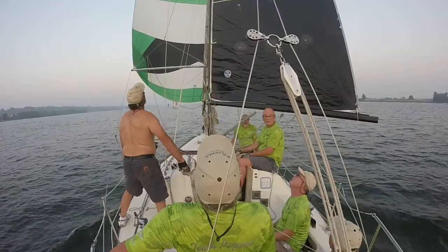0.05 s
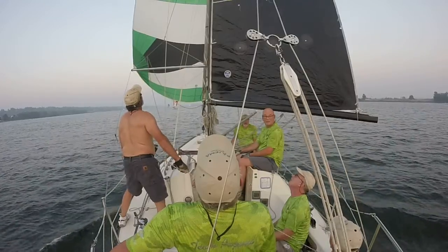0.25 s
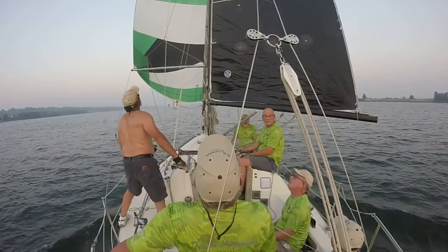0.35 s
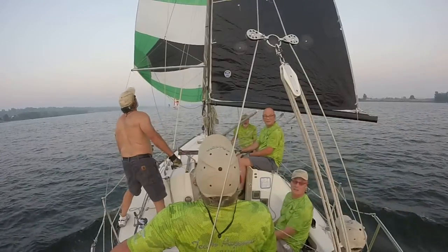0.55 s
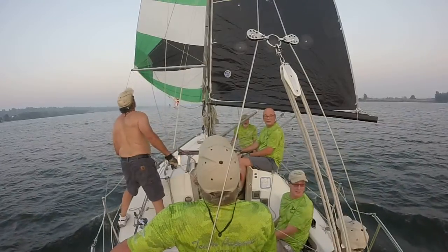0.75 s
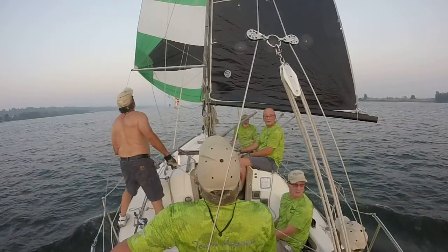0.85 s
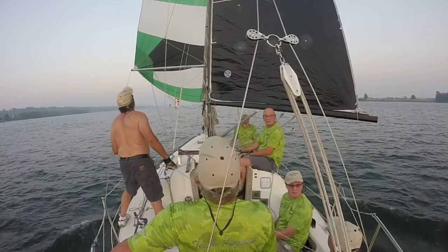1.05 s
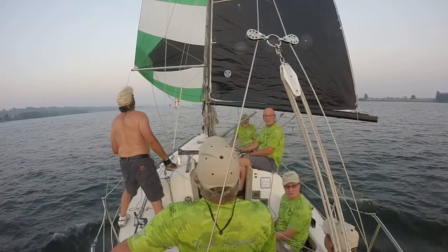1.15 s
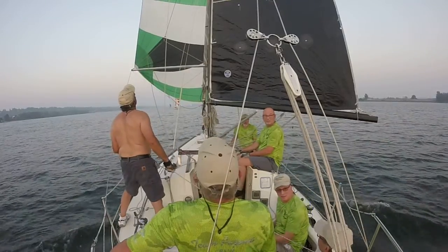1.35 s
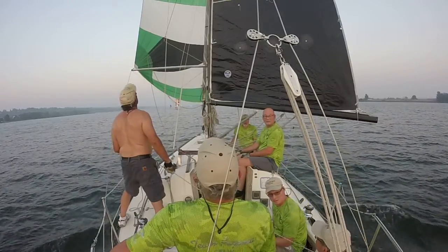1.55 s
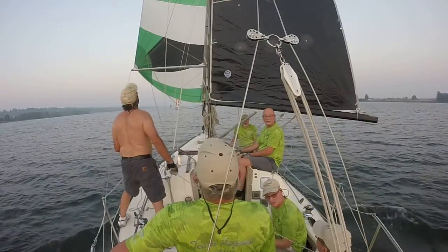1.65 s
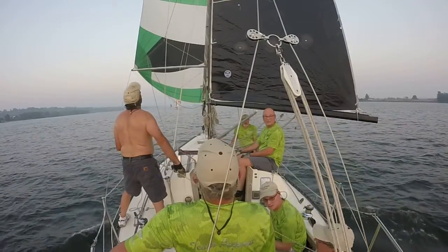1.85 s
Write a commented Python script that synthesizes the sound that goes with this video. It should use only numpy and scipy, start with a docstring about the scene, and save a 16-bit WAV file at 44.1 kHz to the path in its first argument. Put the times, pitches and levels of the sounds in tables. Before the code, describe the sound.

A hard object scrapes and clatters along a sailboat rail, then two knocks, over washing water

```python
"""On the stern of a sailboat, something drags and jolts along the rail that carries the microphone:
slips and bursts of force ring resonators, and dispersion brings the treble first; knocks on the mount
come undelayed. Water washes past as banded noise, with fizz of ringing bubbles, spatter and single
droplets, over low wind rumble and the faint drone of a far motor made of wavering harmonics."""
import sys
import numpy as np
from scipy import signal
from scipy.fft import rfft, irfft, next_fast_len
from scipy.io import wavfile
from scipy.ndimage import uniform_filter1d

SR = 44100
rng = np.random.default_rng(int(sys.argv[2]) if len(sys.argv) > 2 else 0)


def field_ratio(decibels):
    """Amplitude ratio for a level in dB (20 dB per decade); scalars and array-likes work."""
    return 10 ** (np.asarray(decibels, dtype=float) / 20)


def to_wav(s):
    """Save 16-bit WAV."""
    ch = np.atleast_2d(s).T  # columns
    pcm = np.round(np.clip(ch, -1, 1) * 32767)  # PCM
    wavfile.write(sys.argv[1], SR, pcm.astype(np.int16))


N = 83790

# Pressure of the drag along the rail. Each row: time in seconds, relative level in dB.
DRAG_PRESSURE = [(0.2, -38.5), (0.332, -42), (0.402, -30.5), (0.55, -28.5), (0.61, -26.5), (0.68, -26.5),
                 (0.768, -27), (0.94, -36.5), (1.048, -50), (1.15, -40)]
# Jolts on the rail. Each row: start in seconds, relative level in dB, bass share in dB,
# treble share in dB, length in milliseconds.
JOLTS = [(0.351, -17, -8, -9.5, 8.3), (0.388, -9, -15.5, -37, 2.4), (0.417, -10.5, -12.5, -53, 2),
         (0.425, -8, -10, -20.5, 8.8), (0.458, -3, -22.5, -11.5, 8.7), (0.516, -16, -14, -12, 3.7),
         (0.523, -18.5, -13, -9.5, 6.3), (0.578, -9, -30, -29.5, 1.4), (0.643, -10.5, -15, -21, 8.2),
         (0.674, -19.5, -5, -4, 18), (0.734, -6, -11.5, -17.5, 17.6), (0.738, -7, -20.5, -24, 3.6),
         (0.762, -13, -16, -33, 5.9), (0.8, -11, -16, -13.5, 4.6), (0.813, -6.5, -23, -14.5, 6.2),
         (0.85, -12.5, -12.5, -17, 2.9), (0.864, -14.5, -12, -31.5, 17), (0.884, -15, -12.5, -42, 10),
         (0.908, -25.5, -30, -1.5, 1.9), (0.954, -20, -17, -12, 1.5), (0.963, -23.5, -8, -5.5, 5.5),
         (1.013, -28.5, -20, -27, 5.6), (1.037, -24, -29, -14, 5.6), (1.101, -25, -12.5, -22, 6.3)]
# Knocks on the mount itself, right at the microphone. Each row: as for the jolts.
KNOCKS = [(1.268, -10.5, -14.5, -20, 7.1), (1.277, -13, -11, -4.5, 1.4), (1.279, -10.5, -10.5, -10, 9.7),
          (1.297, -28.5, 2.5, -22, 8.8), (1.445, -20, -12.5, -34, 11)]


def rail():
    """Dispersion of bending waves: drag and jolts arrive treble first, knocks at the mount at once."""
    slips_per_s, slip_spread_db = 1500, 2.5
    drag_db, swing_db, swing_hz, drag_treble_db = -3, 1.5, 24.7, 7.5
    lag_at_1k_s = 0.005
    t = np.arange(N) / SR
    fade = np.clip(np.minimum(t - DRAG_PRESSURE[0][0], DRAG_PRESSURE[-1][0] - t) / 0.1, 0, 1)
    slips = rms_one(grains(slips_per_s, slip_spread_db))
    slips = slips * field_ratio(in_time(DRAG_PRESSURE) + drag_db + swing_db * drift(swing_hz)) * fade
    drag_force = np.array([slips, slips, slips * field_ratio(drag_treble_db)]) * field_ratio(19.0)

    rough = rng.choice([-1., 1.], N)
    far = body(drag_force + blows(JOLTS, rough), thud_db=-12.5, low_hz=464, tilt_db=0)

    # bending waves travel with the root of pitch; delays are relative to the arrival at 1 kHz
    size = next_fast_len(N + SR // 4)
    khz = np.arange(size // 2 + 1) * SR / size / 1000
    dispersion = np.exp(-2j * np.pi * 1000 * lag_at_1k_s * (2 * np.sqrt(khz) - khz))
    far = irfft(rfft(far, size) * dispersion, size)[:N]

    # knocks: more and deeper thud, brighter treble
    near = body(blows(KNOCKS, rough), thud_db=-10.5, low_hz=161, tilt_db=10)
    return far + near


def blows(rows, rough):
    """Impulsive excitation: whitened bursts of chatter, as force on bass, middle and treble modes."""
    bass_gain_db, mid_gain_db, treble_gain_db = 10.5, -4, 16
    rise_share = 0.05   # rise time as share of the length
    force, t = np.zeros((3, N + SR)), np.arange(2048) / SR
    for s, db, bass_db, treble_db, ms in rows:
        i = int(s * SR)
        u = t / (max(ms, .5) / 1000)
        envelope = (1 - np.exp(-u / rise_share)) * np.exp(-u * u)
        spectrum = rfft(rough[i:i + len(t)] * envelope)
        # dividing by the smoothed spectrum evens the colour
        push = irfft(spectrum / np.sqrt(uniform_filter1d(np.abs(spectrum) ** 2, size=21)))
        shares_db = np.array([[bass_db + bass_gain_db], [mid_gain_db], [treble_db + treble_gain_db]])
        force[:, i:i + len(t)] += push * field_ratio(db + 35) * field_ratio(shares_db)
    return force[:, :N]


# Resonances of rail and mount. Each row: frequency in Hz, bandwidth in Hz, relative level in dB.
RAIL_MODES = [(186.5, 33, -1), (517.3, 32.6, 6), (691, 38, 1.5), (917, 44.7, 6.5), (1032, 107, -1),
              (1366, 110, -7), (1726, 193, -4), (2257, 81, -13.5), (2823, 153, -27), (3057, 76, -21),
              (3384, 510, -32), (4370, 150, -35.5), (4890, 58, -34.5), (5145, 204, -28)]


def body(force, thud_db, low_hz, tilt_db):
    """Modal superposition: resonances of rail and mount add to a broad thud; tilt in dB per octave."""
    bass_below_hz, treble_above_hz = 800, 2000
    soft_hz, thud_high_hz, top_hz = 2240, 1506, 6100
    # bass and middle modes get a force without its treble
    soft = signal.sosfilt(signal.butter(3, soft_hz, fs=SR, output="sos"), force[:2])
    out = 0
    for k, (hz, width, db) in enumerate(RAIL_MODES):
        if hz < treble_above_hz:
            drive = soft[int(hz > bass_below_hz)]
        else:
            drive = force[2] * field_ratio(tilt_db * np.log2(hz / 3500))
        out = out + (-1) ** k * field_ratio(db) * resonate(drive, hz, width)   # signs alternate
    thud_band = signal.butter(3, [low_hz, thud_high_hz], "band", fs=SR, output="sos")
    thud = signal.sosfilt(thud_band, soft[0] + soft[1])
    return signal.sosfilt(signal.butter(4, top_hz, fs=SR, output="sos"), out + field_ratio(thud_db) * thud)


# Single droplets bursting nearby. Each row: start in seconds, relative level in dB,
# starting pitch in Hz, crack level against the droplet in dB.
DROPS = [(0.1232, -40, 6500, -28), (0.15, -35, 5740, -34), (0.9639, -30.5, 4270, -11),
         (1.0865, -25, 5000, -40), (1.148, -30.5, 4500, -12), (1.206, -41, 5100, -19),
         (1.234, -33, 4440, -2.5), (1.297, -38, 4860, -29), (1.3242, -26, 5770, -16),
         (1.3365, -30, 4240, -23), (1.468, -38, 4960, -10), (1.519, -32, 5170, -19),
         (1.555, -30.5, 4250, -13), (1.8422, -30, 4890, -37), (1.878, -31, 4940, -25)]
# Larger bubbles. Each row: start in seconds, level in dB, starting pitch in Hz.
BUBBLES = [(.966, -20, 740), (.979, -18, 466), (1.106, -30, 510), (1.318, -20, 660), (1.134, -21, 2600),
           (1.241, -33, 2680), (1.34, -27.5, 2920), (1.426, -28, 2600), (1.445, -18, 850),
           (1.527, -27.5, 2960), (1.646, -25, 2540), (1.78, -26.5, 576)]


def drops():
    """Bubble resonance: a decaying ping of rising pitch; droplets add a noisy splat and bright crack."""
    drop_cycles, bubble_cycles = 22, 36   # cycles until 60 dB down, above and up to 1 kHz
    rise = 0.12
    ping_db, splat_db, crack_db = 4, -9.5, -3   # gains for droplets
    burst_s = 0.0086   # splat and crack fall to 5 % in this time
    pings, splat, crack = np.zeros((3, N + SR))
    u = np.arange(SR // 10) / SR
    fall = np.exp(-u / burst_s * 3)
    noise = rng.standard_normal((2, N))
    for s, db, hz, *crack_share_db in list(DROPS) + list(BUBBLES):
        here = slice(int(s * SR), int(s * SR) + len(u))
        is_drop = len(crack_share_db)   # bubbles have no crack column
        cycles, ring = u * hz, drop_cycles if hz > 1000 else bubble_cycles
        envelope = np.minimum(cycles / 3, 1) * np.exp(-6.9 * cycles / ring)
        tone = np.sin(2 * np.pi * cycles * (1 + rise * cycles / ring))
        pings[here] += field_ratio(db + ping_db * is_drop) * envelope * tone
        splat[here] += is_drop * field_ratio(db + splat_db) * fall
        crack[here] += sum(field_ratio(db + c + crack_db) for c in crack_share_db) * fall
    bright = signal.butter(2, 7500, "high", fs=SR, output="sos")
    cracks = signal.sosfilt(bright, crack[:N] * noise[1])
    return pings[:N] + water_colour(splat[:N] * noise[0]) + cracks


# Level of the wash, rumble included; fizz follows it too. Each row: time in seconds, level in dB.
FLOW = [(0, -36.5), (.3, -35.5), (.9, -36), (1.2, -31), (1.5, -34), (1.9, -33.5)]
# Wind rumble against the wash. Each row: time in seconds, gain in dB.
RUMBLE = [(0, 2), (.25, -2), (.7, -2), (1.3, -5.5), (1.6, -4), (1.9, -6)]
# Spectrum of wash and wind. Each row: frequency in Hz, relative density in dB per Hz.
WASH_SPECTRUM = [(15, -33), (28, 4), (50, -5.5), (68, 11.5), (100, 3), (140, 0.5), (180, -2.5), (230, -2.5),
                 (338, -15), (454, -6.5), (563, -12), (842, -8.5), (1190, -20.5), (1480, -33), (2670, -27),
                 (3690, -42.5), (4500, -34), (6480, -40), (8710, -53.5), (13400, -53), (15300, -61)]


def wash():
    """Band-filtered turbulence: third octaves of noise flicker partly together, partly alone."""
    rumble_below_hz = 230
    out, shared = 0, drift(30)
    edges = 20 * 2 ** np.arange(0, 9.7, 1 / 3)
    rumble_db = in_time(RUMBLE) + 0.7 * drift(15)
    white = rng.standard_normal((2, N + SR // 2))   # neighbouring bands use different noise
    f, level = np.transpose(WASH_SPECTRUM)
    for k, (low, high) in enumerate(zip(edges, edges[1:])):
        band_filter = signal.butter(2, [low, high], "band", fs=SR, output="sos")
        band = signal.sosfilt(band_filter, white[k % 2])[-N:]
        db = np.interp(np.log(low * high) / 2, np.log(f), level)
        db = db + rumble_db * (low < rumble_below_hz)
        flicker_db = 1.9 * shared * (low > 1000) + 1.8 * drift(9.0)
        out = out + band * field_ratio(db + flicker_db)
    return rms_one(out) * field_ratio(in_time(FLOW))


def fizz():
    """Resonance of small bubbles: random clicks ring a few cycles; spatter is short noise; both clump."""
    bubbles_per_s, bubble_spread_db, bubble_db, tilt_db_per_octave = 700, 7.5, -26.5, -5.5
    spatters_per_s, spatter_spread_db, spatter_db, spatter_s = 300, 3.6, -21, 0.0006
    ring_q = 7   # centre frequency over bandwidth
    flow, clumps = in_time(FLOW), drift(21)
    clicks = grains(bubbles_per_s * field_ratio(4.1 * clumps), bubble_spread_db)
    dealt = rng.integers(0, 20, N)   # which pitch each click excites
    bubbles = 0
    for k, hz in enumerate(np.geomspace(2200, 11000, 20)):
        ringing = resonate(clicks * (dealt == k), hz, hz / ring_q)
        ringing = resonate(ringing, hz, hz / ring_q)
        bubbles = bubbles + rms_one(ringing) * field_ratio(tilt_db_per_octave * np.log2(hz / 2200))
    hits = np.abs(grains(spatters_per_s * field_ratio(1.6 * clumps), spatter_spread_db))
    bursts = signal.lfilter([1], [1, -np.exp(-1 / (spatter_s * SR))], hits)
    spatter = water_colour(bursts * rng.standard_normal(N))
    return rms_one(bubbles) * field_ratio(flow + bubble_db) + rms_one(spatter) * field_ratio(flow + spatter_db)


def water_colour(x):
    """Linear filtering by the upper part of the wash spectrum; white of rms 1 stays near rms 1."""
    low_hz = 1730
    f, (hz, db) = np.arange(1, N // 2 + 2) * SR / N, np.transpose(WASH_SPECTRUM)
    gain = field_ratio(np.interp(np.log(f), np.log(hz), db)) / np.sqrt(1 + (low_hz / f) ** 8)
    return irfft(rfft(x) * rms_one(gain), N)


# Motor drone. Each row: multiple of the fundamental, mid level in dB.
MOTOR_HARMONICS = [(1, -45), (2, -47), (3, -47)]


def motor():
    """Harmonic synthesis: multiples of one slightly wavering fundamental, each drifting in level."""
    fundamental_hz, waver, level_swing_db = 87.5, 0.004, 4.9
    phase = 2 * np.pi * np.cumsum(fundamental_hz * (1 + waver * drift(3.1))) / SR
    out = 0
    for multiple, db in MOTOR_HARMONICS:
        level = np.sqrt(2) * field_ratio(db + level_swing_db * drift(11))
        out = out + level * np.sin(round(multiple) * phase + rng.uniform(0, 2 * np.pi))
    return out


def in_time(rows):
    """Linear interpolation: join curve rows by straight lines."""
    s, v = np.transpose(rows)
    return np.interp(np.arange(N) / SR, s, v)


def rms_one(x):
    """Power normalisation: scale to rms 1."""
    return x / np.sqrt(np.mean(x ** 2) + 1e-20)


def drift(rate):
    """Low-passed noise: a slow random curve of spread 1, its rate in Hz."""
    step = 40   # samples between points
    r = np.exp(-2 * step * np.pi * rate / SR)
    white = rng.standard_normal(N // step + 2002)
    slow = signal.lfilter([1], [1, -2 * r, r * r], white)[2000:]
    return np.interp(np.arange(N) / step, np.arange(len(slow)), rms_one(slow))


def resonate(x, hz, width):
    """Damped oscillator: a two-pole resonance of peak gain 1, width in Hz."""
    r = np.exp(-np.pi * width / SR)
    zeros = np.array([1, 0, -1]) * (1 - r * r) / 2
    poles = [1, -2 * r * np.cos(2 * np.pi * hz / SR), r * r]
    return signal.lfilter(zeros, poles, x + 1e-18)


def grains(rate, spread_db):
    """Poisson-like process: random clicks of uneven size and either sign, rate per second."""
    sizes = field_ratio(spread_db * np.minimum(rng.exponential(1, N), 4)) * rng.choice([-1, 1], N)
    return sizes * (rng.random(N) < rate / SR)


def scene():
    """Superposition: all sources add at one microphone."""
    return (rail() + wash() + fizz() + drops() + motor())[None]


def band_limit(x):
    """A steep low-pass at the top of the band."""
    return signal.sosfilt(signal.butter(12, 15460, fs=SR, output="sos"), x)


def record(dry):
    """Band limitation: a steep low-pass cuts the top."""
    low_pass = signal.cheby2(10, 50, 15750, fs=SR, output="sos")   # 50 dB down from 15750 Hz
    mix = signal.sosfilt(low_pass, dry)
    return band_limit(mix)


dry = scene()
out = record(dry)
to_wav(out)
```